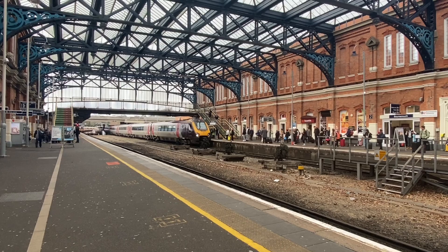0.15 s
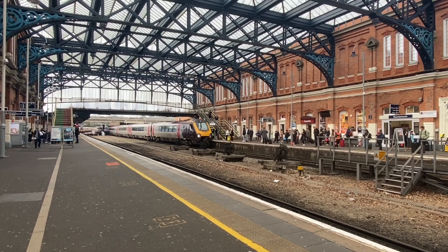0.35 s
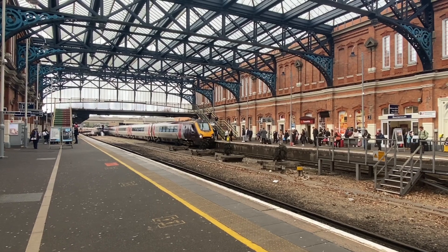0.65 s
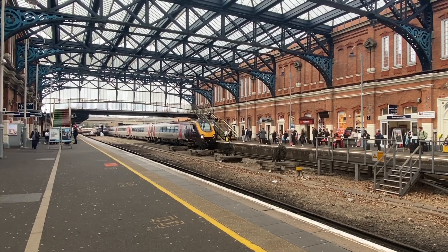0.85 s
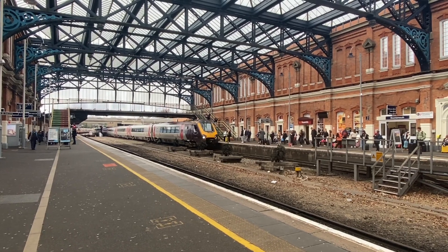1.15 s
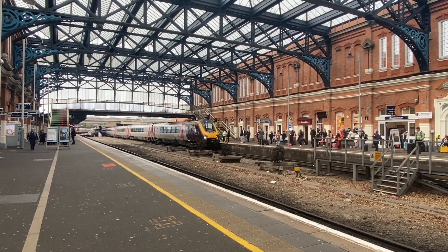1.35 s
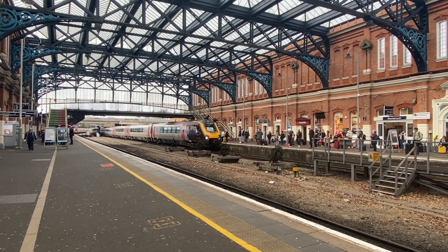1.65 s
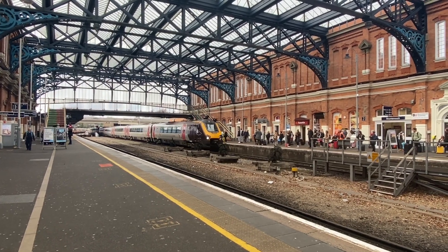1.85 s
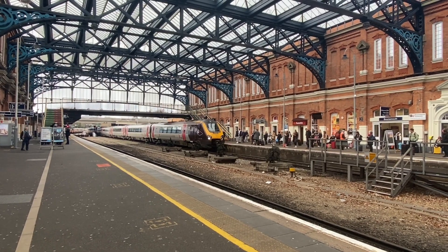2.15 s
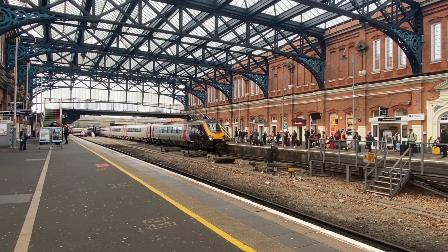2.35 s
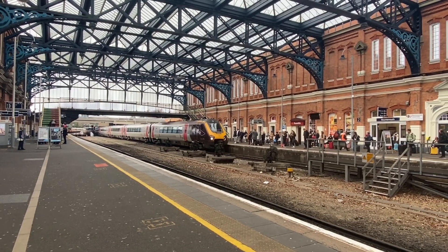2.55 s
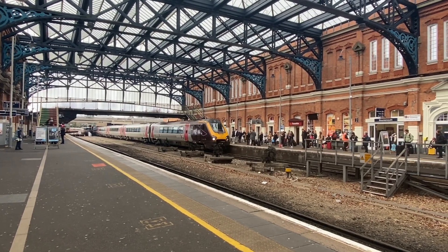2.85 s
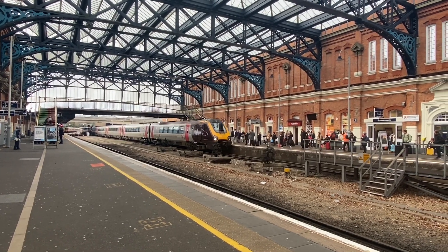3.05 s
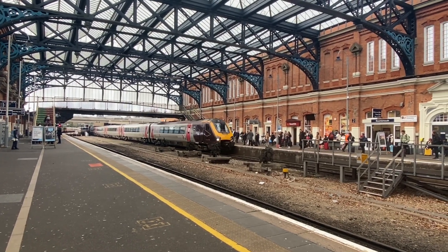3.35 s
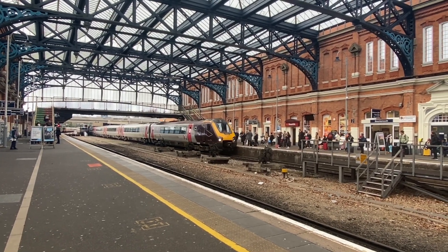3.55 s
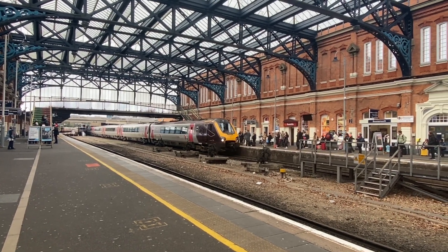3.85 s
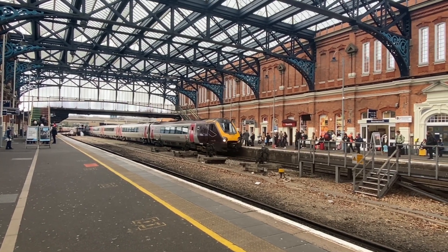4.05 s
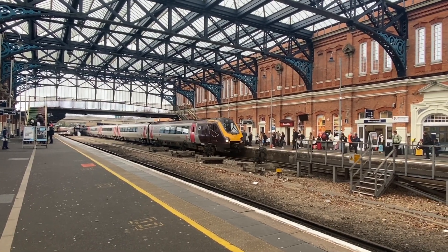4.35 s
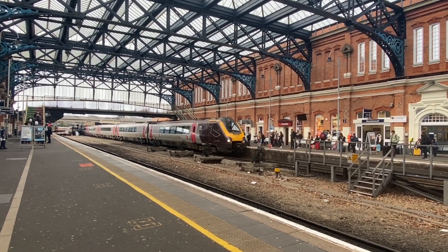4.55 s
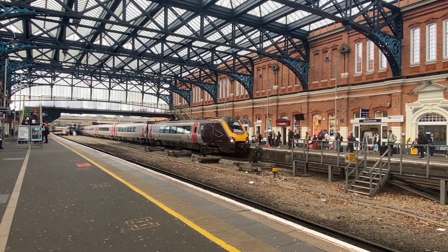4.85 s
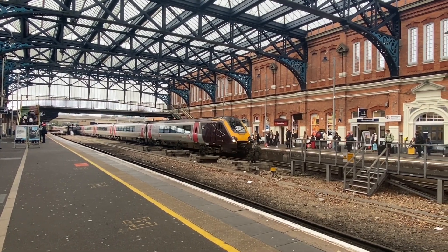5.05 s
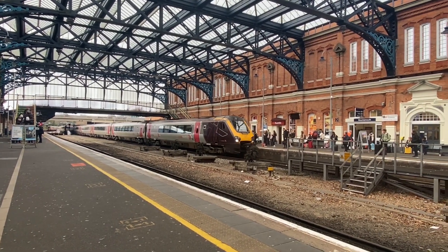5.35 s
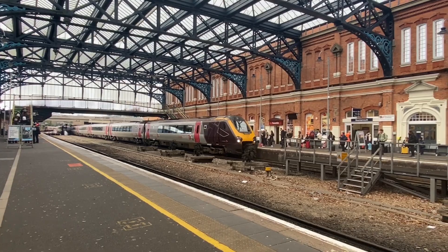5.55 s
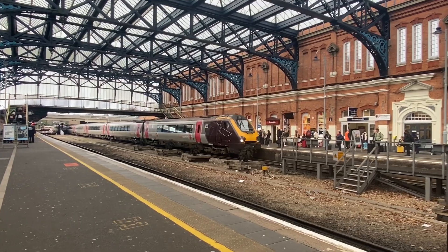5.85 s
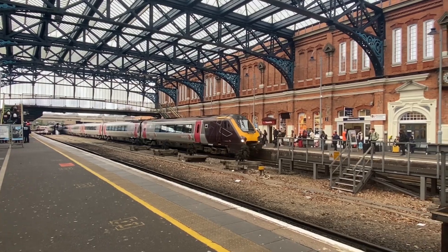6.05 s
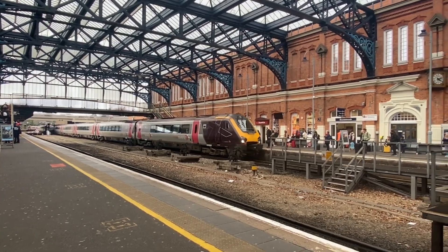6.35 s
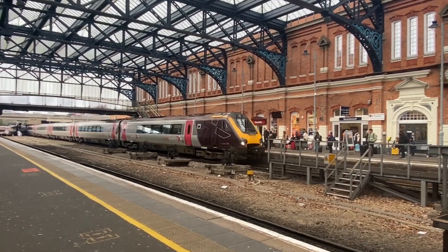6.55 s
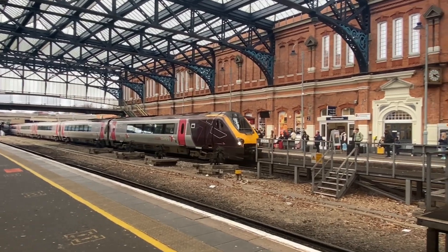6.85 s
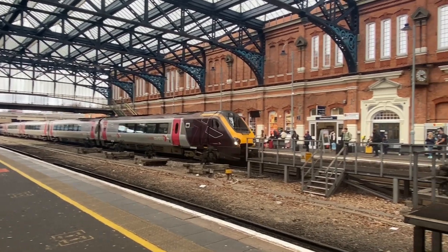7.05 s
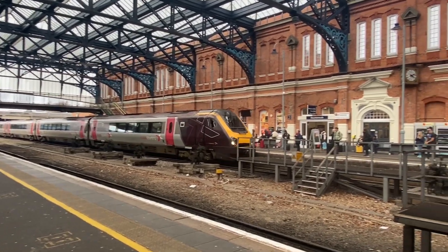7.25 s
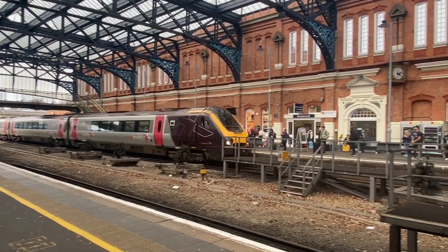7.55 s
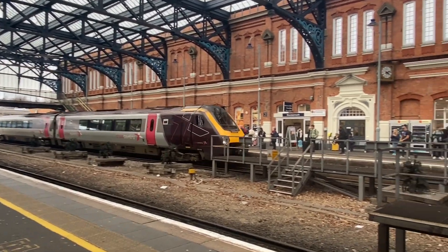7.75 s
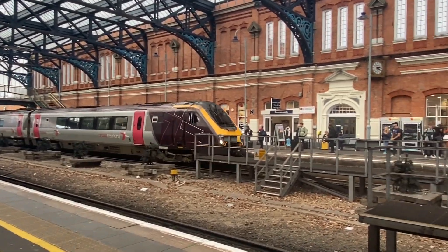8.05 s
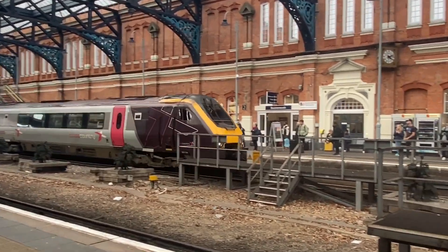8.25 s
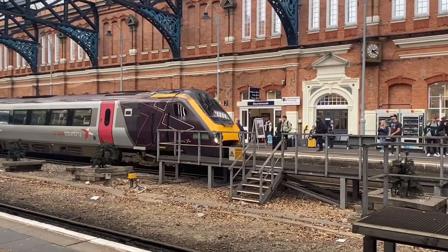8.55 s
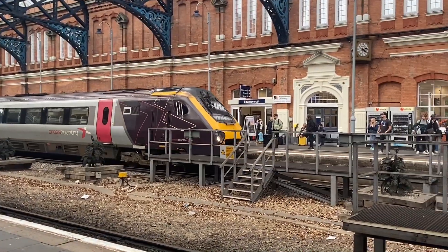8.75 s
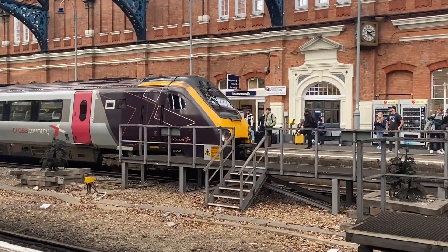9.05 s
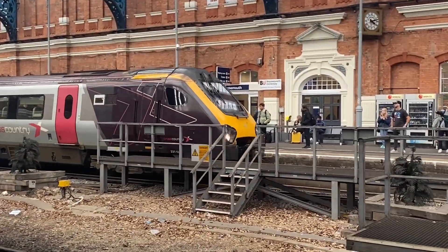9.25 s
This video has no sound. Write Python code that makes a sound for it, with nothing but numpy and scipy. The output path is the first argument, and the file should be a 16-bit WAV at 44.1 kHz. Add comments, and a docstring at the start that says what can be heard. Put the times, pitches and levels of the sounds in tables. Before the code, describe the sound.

A diesel passenger train approaches slowly inside a big roofed station. A deep, steady engine hum beats and wavers over broad rumble, mid-range roar and soft hiss. Two faint air puffs come early, short wheel chirps and rail-joint knocks near the middle, then the leading engine swells close by. Heard in stereo from the platform, the small sounds echo in the hall.

```python
"""A diesel passenger train rolls slowly into a station hall and grows louder.
From the start: beating six-cylinder hum and throb (fading sine harmonics), and rumble, roar, hiss, growl
and a thin whine (filtered noise and wavering resonances); wheel squeals (chirps) come and go.
Two air puffs (noise) follow early on, then knocks over a rail joint (noise bursts) near the middle.
Later the leading engine's rumble swells; near the end the stereo image closes to the middle."""
import sys
import numpy as np
from scipy import signal
from scipy.io import wavfile

SR = 44100
rng = np.random.default_rng(int(sys.argv[2]) if len(sys.argv) > 2 else 0)


def wav_record(signal):
    """Record a signal, one row per channel, as 16-bit PCM in the file named by sys.argv[1]."""
    frames = np.transpose(np.atleast_2d(signal))
    bounded = np.clip(frames, -1, 1)
    # unit amplitude maps onto the largest positive 16-bit level
    quanta = np.round(bounded * 32767).astype(np.int16)
    wavfile.write(sys.argv[1], SR, quanta)


N = 414540
TIME = np.arange(N) / SR

# Six cylinders at a fast idle: firings per second.
FIRING_HZ = 59.25
# Hum harmonics 1-4 as the engines move through standing waves. Each row: time in seconds, untrimmed level in dB.
FIRING_TONE = [(0.0, -25), (0.93, -28), (1.51, -23), (2.14, -31), (2.62, -22.5), (2.97, -26), (3.81, -17.5),
               (4.28, -19), (4.82, -31.5), (5.03, -21), (5.7, -23), (6.52, -14.5), (8.63, -20), (9.4, -16)]
OCTAVE = [(0.0, -23), (1.04, -28.5), (1.28, -20.5), (2.15, -27), (2.48, -17.5), (2.83, -20.5),
          (4.23, -18.5), (4.52, -28.5), (5.49, -13.5), (5.67, -28.5), (5.85, -25), (6.03, -36.5),
          (6.35, -24), (6.85, -25.5), (7.0, -16.5), (7.72, -20.5), (7.93, -14), (8.4, -12), (9.0, -18),
          (9.4, -17.5)]
TWELFTH = [(0.0, -27), (0.98, -40), (1.14, -23), (1.66, -20), (1.95, -28.5), (2.5, -28), (2.87, -20.5),
           (3.4, -23.5), (3.8, -26), (4.82, -28), (5.15, -24.5), (5.9, -19), (6.28, -21.5), (6.45, -32.5),
           (6.73, -23), (6.98, -33), (7.45, -18.5), (7.8, -26.5), (8.15, -20), (8.56, -15.5), (8.75, -21.5),
           (8.95, -19), (9.4, -26)]
DOUBLE_OCTAVE = [(0, -35.5), (.55, -34), (2.1, -35.5), (3.1, -33.5), (3.5, -43.5), (4.6, -39.5),
                 (5.1, -33.5), (5.6, -42), (6.05, -29), (6.5, -39), (6.9, -26), (7.25, -28.5),
                 (7.65, -30.5), (8.3, -35.5), (8.8, -28.5), (9.4, -36)]
# Engines and echoes cancel: the harmonic drops out and returns inverted. Each entry: time in seconds.
OCTAVE_NULLS_S = [1.51, 1.81, 4.54]
TWELFTH_NULLS_S = [.67, 1.52, 1.87, 4.0, 4.47, 4.85, 5.3, 6.08, 7.1, 7.62, 8.33, 9.17]
DOUBLE_OCTAVE_NULLS_S = [1.0, 2.4, 4.3, 7.03, 7.48, 8.0, 8.55, 9.07]
# Null passage at the firing tone's wavelength (shorter waves pass sooner); side echo against mean level.
NULL_S, SIDE_ECHO_DB = 0.3, 3
# Engines further down the train: level of harmonics 1-3, and how much faster they fire.
REAR_ENGINES_DB, REAR_OFFSET_HZ = [-45, -38, -40.5], 1.1
# Lines from unequal cylinders. Each row: multiple of the two-turn engine cycle rate, level in dB before sway.
CYCLE_LINES = [(3, -50.5), (5, -43.5), (7, -40.5), (8, -48.5), (9, -44.5), (10, -43.5), (13, -42),
               (14, -32.5), (15, -48.5), (16, -39), (17, -45), (19, -40), (20, -42.5), (21, -42),
               (22, -35.5), (23, -46), (25, -44), (26, -45), (27, -41.5), (30, -46), (32, -48), (33, -47),
               (36, -46), (78, -52), (84, -49), (93, -51)]

# Nearness of the train. Each row: time in seconds, gain in dB.
APPROACH = [(0, -3.5), (1.3, -2.5), (3.5, -1.0), (4.8, -0.1), (5.6, 1.27), (7.6, 1.5), (9.4, 2.5)]
# Noise spectra. Each row: frequency in Hz, relative density in dB per Hz.
RUMBLE = [(18, -21.5), (36, -16.5), (55, 0), (90, -3.5), (130, -1.5), (200, -3), (280, -6), (380, -12),
          (480, -11), (640, -15.5), (1000, -34)]
ROAR = [(400, -17), (650, -3), (800, 0), (980, -4), (1130, -4), (1450, -6.5), (1700, -6.5), (2100, -13.5),
        (3000, -27)]
HISS = [(1400, -17), (2100, -0.5), (2600, -1), (3050, -.5), (3700, -7.5), (4600, -10.5), (5400, -14),
        (6700, -17.5), (8500, -29.5), (10800, -27), (13000, -32.5)]
# Levels before approach, surge and sway; share of the approach gain that each follows, in dB per dB.
RUMBLE_DB, RUMBLE_FOLLOWS = -29, 0.7
ROAR_DB, ROAR_FOLLOWS = -35, 0.86
HISS_DB, HISS_FOLLOWS = -44.5, 1.03
# The throb follows a share of the rumble's engine gain; both follow a share of the growl's swing.
THROB_FOLLOWS, THROB_SWAYS, RUMBLE_SWAYS = 0.28, 0.24, 0.12
# The leading engine draws level: its rumble grows from here on.
ABREAST_S, ABREAST_DB_PER_S = 6.6, 0.82
# Brief surges of the rolling noise. Each row: start in seconds, rise in dB before the envelope.
SURGES = [(4.04, 2), (5.12, 0.5)]
SURGE_ATTACK_S, SURGE_DECAY_S = 0.13, 0.22

# Low underframe resonances. Each row: frequency in Hz, width in Hz, level in dB against the growl.
UNDERFRAME = [(323.2, 34, -5), (378, 24, -0.6), (422.6, 26, -3.5), (478.6, 30, -5.5), (551.6, 40, -4)]
# Growl of the underframe. Each row: time in seconds, level in dB.
GROWL = [(0, -41), (1.5, -41.5), (3.2, -42.5), (4.8, -41.5), (5.6, -37.5), (6.7, -38.5), (7.3, -39),
         (8.2, -37), (9.4, -36)]
# Engine casings and drive ringing. Each row: frequency in Hz, width in Hz, level in dB against the roar.
CASING = [(776, 54, -11), (826, 32, -10.5), (880.5, 47, -9.5), (908, 8.1, -16), (1045, 40, -14),
          (2962, 240, -17.5), (4670, 320, -28.5)]
# Thin whine of the drive. Each row: frequency in Hz, width in Hz, level in dB against the whine.
WHINE = [(848, 26, 1.5), (1680, 78, 1), (1743, 40, 1.5)]
# Level of that whine. Each row: time in seconds, level in dB.
WHINE_LEVEL = [(0, -56.5), (3, -51), (5.7, -50.5), (6.6, -45.5), (8.0, -48), (8.64, -44.5), (9.4, -45)]
# Ground reflection: band, then each row: time in seconds, share cancelled from 0 to 1.
DIP_HZ, DIP_WIDTH_HZ = 540, 170
GROUND_DIP = [(0, 0.17), (1.7, 0), (3.0, .35), (3.9, 0.054), (5.2, .25), (6.3, 0), (9.4, 0.06)]

# Wheel squeals. Each row: start and end in seconds, first and last pitch in Hz, level in dB, roughness 0 to 1.
SQUEALS = [(.33, .66, 1214, 1225, -50, .6), (3.12, 3.4, 1045, 1050, -47, 1),
           (3.318, 3.44, 877, 859, -34.5, 0.3), (3.54, 3.63, 865, 883, -35, 0.35),
           (3.65, 3.75, 884, 910, -34, .25), (4.12, 4.24, 878, 878, -38, .5),
           (4.99, 5.09, 872, 858, -37, 0.3), (5.08, 5.18, 813, 776, -39, .6),
           (5.26, 5.358, 734, 732, -43.5, .6), (5.05, 5.2, 4450, 4490, -54.5, .7),
           (5.193, 5.26, 4785, 4740, -61, .8), (5.28, 5.325, 4800, 4790, -54.5, .5),
           (5.325, 5.355, 4520, 4460, -54.5, 1), (5.365, 5.46, 4760, 4780, -57, .9),
           (5.0, 5.399, 6540, 6400, -67, 1), (5.92, 6.08, 800, 800, -42, 1),
           (7.05, 7.196, 7300, 7250, -64, 1), (8.29, 8.42, 1190, 1144, -45, 0.7),
           (8.402, 8.858, 1147, 1133, -46, 1)]
# Rail joint knocks. Each row: start in seconds, centre in Hz, width in Hz, level in dB before the envelope.
KNOCKS = [(4.09, 3700, 1000, -47), (4.125, 420, 260, -32.5), (4.11, 2100, 1200, -39.5),
          (4.215, 2390, 700, -40.5), (4.35, 340, 160, -29.5), (5.24, 460, 260, -31)]
KNOCK_ATTACK_S, KNOCK_DECAY_S = .015, 0.025
# Air puffs. Each row: start in seconds, centre in Hz, width in Hz, level in dB before the envelope.
PUFFS = [(1.34, 6700, 3420, -57.5), (2.2, 6480, 3620, -59)]
PUFF_ATTACK_S, PUFF_DECAY_S = .09, .13
HALL_T60_S = 2.5

# Left-right likeness. Each row: frequency in Hz, correlation from -1 to 1.
LIKENESS = [(60, .991), (130, .996), (250, 0.9), (400, 0.58), (600, -0.08), (950, 0.12), (1600, -0.32),
            (2600, 0), (4500, 0.14), (5600, 0), (7000, 0.3), (9000, -0.5), (12000, 0)]
# Left-right balance. Each row: frequency in Hz, left minus right in dB.
BALANCE = [(60, 1.6), (180, -2.3), (350, -1), (600, 1), (950, 3.5), (1500, 1.5), (2100, 2), (2900, 4),
           (4000, 1), (6000, 0)]
# Closing of the stereo image. Each row: time in seconds, amount from 0 to 1.
NARROWING = [(0, 0), (7.95, 0), (8.4, 0.4), (8.85, 0.55), (9.2, 1), (9.4, 1)]
# Bands that the narrowing lifts and lowers; stopband edge of the top cut.
PRESENCE_HZ, TREBLE_HZ, STOPBAND_HZ = (2930, 4000), (4700, 7200), 13400


def from_db(db):
    """Decibels to gain."""
    return 10 ** (np.asarray(db) / 20)


def rms_one(x):
    """Scale to unit power."""
    return x / np.sqrt(np.mean(x ** 2) + 1e-20)


def in_time(rows):
    """Value of a curve at every sample."""
    s, value = np.transpose(rows)
    return np.interp(TIME, s, value)


def at_hz(rows, hz):
    """Read a table on a log-frequency axis."""
    table_hz, value = np.transpose(rows)
    return np.interp(np.log(hz), np.log(table_hz), value)


def drift(rate_hz):
    """Smooth chance of spread 1 that changes about rate_hz times a second."""
    pole = np.exp(-200 * np.pi * rate_hz / SR)
    # one value per 100 samples; the first 2000 let the filter settle
    white = rng.standard_normal(N // 100 + 2002)
    slow = signal.lfilter([1], [1, -2 * pole, pole * pole], white)[2000:]
    return np.interp(np.arange(N) / 100, np.arange(len(slow)), rms_one(slow))


def fading_tone(phase, rate_hz):
    """A tone that arrives by many changing paths: its level and phase wander."""
    return drift(rate_hz) * np.cos(phase) + drift(rate_hz) * np.sin(phase)


def band(x, low_hz, high_hz):
    """Butterworth band-pass."""
    return signal.sosfilt(signal.butter(2, [low_hz, high_hz], "band", fs=SR, output="sos"), x)


def band_around(x, centre_hz, width_hz):
    """Band-pass given by centre and width."""
    return band(x, centre_hz - width_hz / 2, centre_hz + width_hz / 2)


def swell(start_s, end_s, edge_s):
    """A soft opening and closing around a span."""
    inside_s = np.minimum(TIME - start_s, end_s - TIME)
    return np.sin(np.pi / 2 * np.clip(inside_s / edge_s + .5, 0, 1)) ** 2


def burst(start_s, attack_s, decay_s):
    """A quick rise, then an exponential fall."""
    age_s = TIME - start_s
    return np.clip(age_s / attack_s, 0, 1) * np.exp(-np.maximum(age_s - attack_s, 0) / decay_s)


def at_ports(mid, side, hz):
    """Left and right of a diffuse sound: alike in the bass, mostly unrelated higher up."""
    alike = at_hz(LIKENESS, hz)
    flip = np.array([[1], [-1]])
    pair = np.sqrt(1 + alike) * mid + np.sqrt(1 - alike) * side * flip
    return pair * from_db(flip * at_hz(BALANCE, hz) / 2) / np.sqrt(2)


def diffuse_noise(spectrum, patchy_db, count, tilt_db=0):
    """Stereo noise in count flickering bands, tilted by tilt_db an octave; the middle has unit power."""
    out = 0
    edges_hz = np.geomspace(spectrum[0][0], spectrum[-1][0], count + 1)
    centre_hz = np.sqrt(edges_hz[0] * edges_hz[-1])
    # neighbouring bands use different noise
    white = rng.standard_normal((2, 2, N))
    for k, (low_hz, high_hz) in enumerate(zip(edges_hz, edges_hz[1:])):
        hz = np.sqrt(low_hz * high_hz)
        level_db = at_hz(spectrum, hz) + patchy_db * drift(7.5) + tilt_db * np.log2(hz / centre_hz)
        mid, side = band(white[k % 2], low_hz, high_hz)
        out = out + from_db(level_db) * at_ports(mid, side, hz)
    return out / np.std(out.mean(axis=0))


def wavering_ring(modes, waver, flicker_db):
    """Clatter, blurred by the hall, keeps resonances ringing; each wanders in pitch and comes and goes."""
    out = 0
    for hz, width_hz, level_db in modes:
        phase = 2 * np.pi * np.cumsum(hz * (1 + waver * drift(3))) / SR
        ringing = np.array([fading_tone(phase, 0.62 * width_hz) for _ in range(2)])
        mid, side = rms_one(ringing * from_db(flicker_db * drift(3)))
        out = out + from_db(level_db) * at_ports(mid, side, hz)
    return out


def exhaust_hum(firing_phase, trims_db, wander_rad, scatter):
    """Four firing harmonics; changing echo paths push their phases and cancel the high ones now and then."""
    out = 0
    curves = [FIRING_TONE, OCTAVE, TWELFTH, DOUBLE_OCTAVE]
    nulls_s = [[], OCTAVE_NULLS_S, TWELFTH_NULLS_S, DOUBLE_OCTAVE_NULLS_S]
    for k, (curve, nulls, trim_db) in enumerate(zip(curves, nulls_s, trims_db), 1):
        level_db = in_time(curve) + trim_db
        gain = from_db(level_db)
        for null_s in nulls:
            gain = gain * np.tanh(k * (TIME - null_s) / NULL_S)
        phase = k * (firing_phase + wander_rad * drift(0.51)) + rng.uniform(0, 2 * np.pi)
        tone = np.sqrt(2) * np.sin(phase) + scatter * fading_tone(phase, 11.0)
        # side-wall echoes keep their strength through the nulls
        sideways = from_db(level_db.mean() + SIDE_ECHO_DB) * fading_tone(phase, 0.98)
        out = out + at_ports(gain * tone, sideways, k * FIRING_HZ)
    return out


def rear_engines(firing_phase):
    """Engines further back idle a little faster, so the hum beats unevenly."""
    phase = firing_phase + 2 * np.pi * REAR_OFFSET_HZ * TIME
    return sum(from_db(level_db) * fading_tone(k * phase, 1.52)
               for k, level_db in enumerate(REAR_ENGINES_DB, 1))


def cylinder_throb(firing_phase, fade_rate_hz, gain_db):
    """No two of the six cylinders fire alike, so lines stand at multiples of the whole cycle."""
    out = 0
    for multiple, level_db in CYCLE_LINES:
        ratio = multiple / 6
        phase, rate_hz = ratio * firing_phase, fade_rate_hz * np.sqrt(ratio)
        mid, side = fading_tone(phase, rate_hz), fading_tone(phase, rate_hz)
        out = out + from_db(level_db) * at_ports(mid, side, ratio * FIRING_HZ)
    return from_db(gain_db) * out


def engine_rumble(gain_db, tilt_db):
    """Low machinery noise, diffuse and tilted brighter as tilt_db rises."""
    return from_db(RUMBLE_DB + gain_db) * diffuse_noise(RUMBLE, patchy_db=1.0, count=14, tilt_db=tilt_db)


def underframe_growl(level_db):
    """Low resonances of the underframe, kept ringing."""
    return from_db(level_db) * wavering_ring(UNDERFRAME, waver=.015, flicker_db=2.2)


def rolling_roar(near_db, surge_db):
    """Mid-band noise of machinery and wheels, with ringing casings and drive."""
    noise = from_db(-1.08) * diffuse_noise(ROAR, patchy_db=1.5, count=14)
    ringing = wavering_ring(CASING, waver=.005, flicker_db=-0.5)
    return from_db(ROAR_DB + ROAR_FOLLOWS * near_db + surge_db) * (noise + ringing)


def rolling_hiss(near_db, surge_db):
    """Diffuse treble noise that grows and surges with the rolling."""
    noise = diffuse_noise(HISS, patchy_db=1.23, count=18)
    return from_db(HISS_DB + HISS_FOLLOWS * near_db + surge_db) * noise


def drive_whine():
    """Narrow wavering resonances of the drive."""
    return from_db(in_time(WHINE_LEVEL)) * wavering_ring(WHINE, waver=.008, flicker_db=1.0)


def wheel_squeals(waver, edge_s, blur_hz):
    """A wheel sticks and slips on the rail and sings in short wavering chirps, some clean, some ragged."""
    out = 0
    for start_s, end_s, first_hz, last_hz, level_db, rough in SQUEALS:
        glide_hz = np.interp(TIME, [start_s, end_s], [first_hz, last_hz])
        phase = 2 * np.pi * np.cumsum(glide_hz * (1 + waver * drift(40))) / SR
        clean = np.sqrt(2 * (1 - rough)) * np.sin(phase)
        ragged = np.sqrt(rough) * fading_tone(phase, blur_hz * rough)
        out = out + from_db(level_db) * swell(start_s, end_s, edge_s) * (clean + ragged)
    return out


def joint_knocks():
    """Running gear knocks over a rail joint: dull thuds and brighter clanks of band noise."""
    out = 0
    for start_s, hz, width_hz, level_db in KNOCKS:
        noise = rms_one(band_around(rng.standard_normal(N), hz, width_hz))
        out = out + from_db(level_db) * burst(start_s, KNOCK_ATTACK_S, KNOCK_DECAY_S) * noise
    return out


def air_puffs(flutter_db):
    """Short soft hisses from the train's air system, fluttering as they die away."""
    out = 0
    white = rng.standard_normal(N) * from_db(flutter_db * drift(20))
    for start_s, hz, width_hz, level_db in PUFFS:
        noise = rms_one(band_around(white, hz, width_hz))
        out = out + from_db(level_db) * burst(start_s, PUFF_ATTACK_S, PUFF_DECAY_S) * noise
    return out


def ground_dip(x):
    """The ground reflection cancels part of a low-middle band, which sounds hollow."""
    return x - in_time(GROUND_DIP) * band_around(x, DIP_HZ, DIP_WIDTH_HZ)


def hall(x, wet):
    """Direct sound plus a dense tail from roof and walls, different in each ear."""
    t = TIME[:2 * SR]
    tail = rng.standard_normal((2, len(t))) * from_db(-60 * t / HALL_T60_S)
    tail /= np.sqrt(np.sum(tail ** 2, axis=1)[:, None])
    return np.sqrt(1 - wet) * x + np.sqrt(wet) * signal.fftconvolve(x[None], tail, axes=1)[:, :N]


def narrow_image(x, split_hz, low_db, high_db, presence_lift, treble_loss):
    """Turn down the left-right difference, most of all in the treble, and trade treble for presence."""
    amount = in_time(NARROWING)
    mid, side = (x[0] + x[1]) / 2, (x[0] - x[1]) / 2
    low = signal.sosfiltfilt(signal.butter(2, split_hz, fs=SR, output="sos"), side)
    side = low * from_db(low_db * amount) + (side - low) * from_db(high_db * amount)
    mid = mid + amount * (presence_lift * band(mid, *PRESENCE_HZ) - treble_loss * band(mid, *TREBLE_HZ))
    return np.array([mid + side, mid - side])


def scene():
    """Engines and rolling noise, plus small sounds in the hall."""
    firing_phase = 2 * np.pi * FIRING_HZ * TIME
    near_db = in_time(APPROACH)
    engine_db = RUMBLE_FOLLOWS * near_db + ABREAST_DB_PER_S * np.maximum(TIME - ABREAST_S, 0)
    surge_db = sum(rise_db * burst(s, SURGE_ATTACK_S, SURGE_DECAY_S) for s, rise_db in SURGES)
    growl_db = in_time(GROWL)
    sway_db = growl_db - growl_db.mean()

    hum = exhaust_hum(firing_phase, trims_db=[.2, 0.34, -0.12, -0.55], wander_rad=0.5, scatter=0.1)
    throb_db = THROB_FOLLOWS * engine_db + THROB_SWAYS * sway_db
    throb = cylinder_throb(firing_phase, fade_rate_hz=0.79, gain_db=throb_db)
    engines = hum + rear_engines(firing_phase) + throb

    # the rumble also opens up as the train nears
    rumble = engine_rumble(engine_db + RUMBLE_SWAYS * sway_db, tilt_db=0.18 * engine_db + .2 * surge_db)
    hollowed = ground_dip(rumble + underframe_growl(growl_db) + rolling_roar(near_db, surge_db))
    treble = rolling_hiss(near_db, surge_db) + drive_whine()

    squeals = wheel_squeals(waver=.003, edge_s=0.03, blur_hz=33)
    small = hall(squeals + joint_knocks() + air_puffs(flutter_db=2.5), wet=0.24)
    return engines + hollowed + treble + small


def record(dry):
    """Close the stereo image, soften the ends, then cut the top steeply."""
    narrowed = narrow_image(dry, split_hz=1960, low_db=-6.0, high_db=-26.0, presence_lift=.25, treble_loss=.2)
    narrowed = narrowed * swell(.003, TIME[-1] - .003, .006)
    return signal.sosfilt(signal.cheby2(12, 60, STOPBAND_HZ, fs=SR, output="sos"), narrowed)


dry = scene()
out = record(dry)
wav_record(out)
```